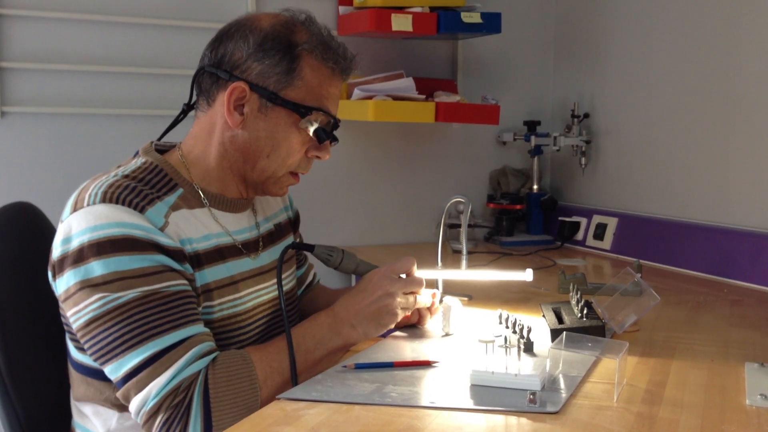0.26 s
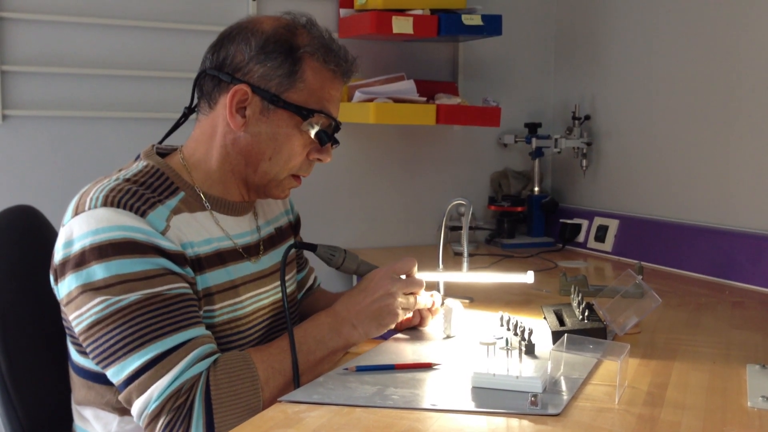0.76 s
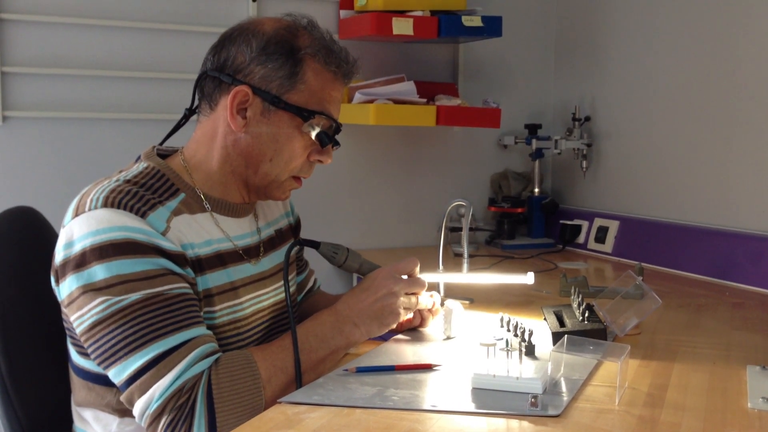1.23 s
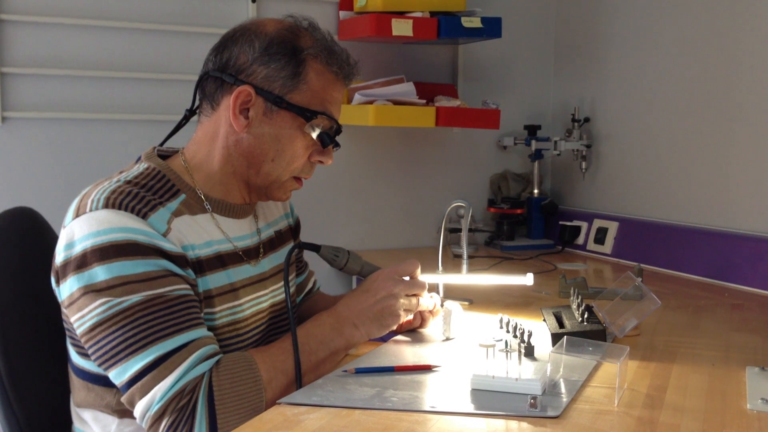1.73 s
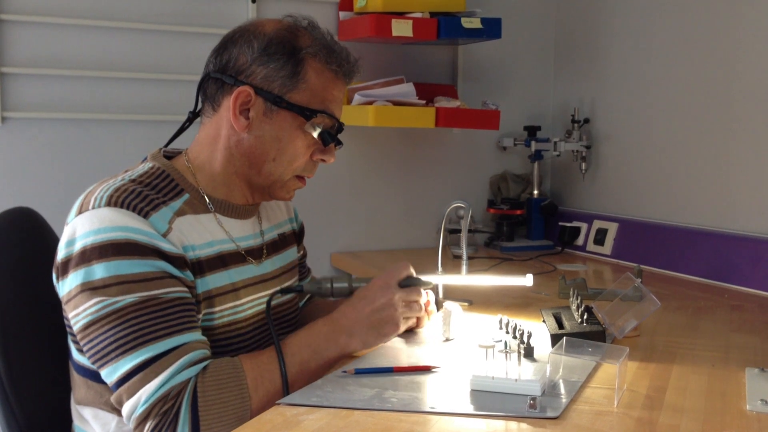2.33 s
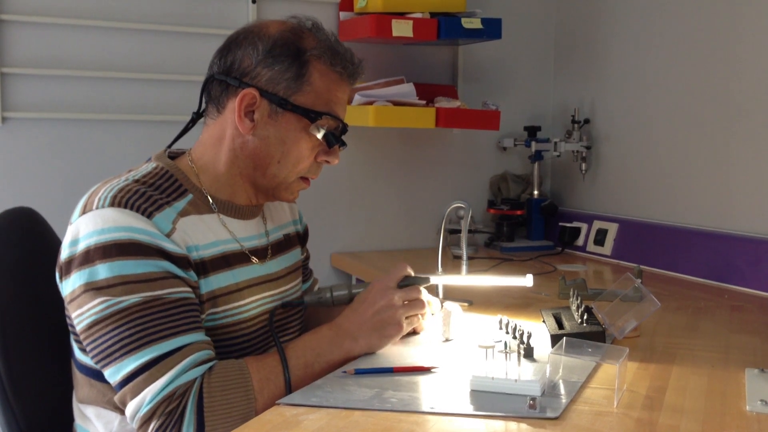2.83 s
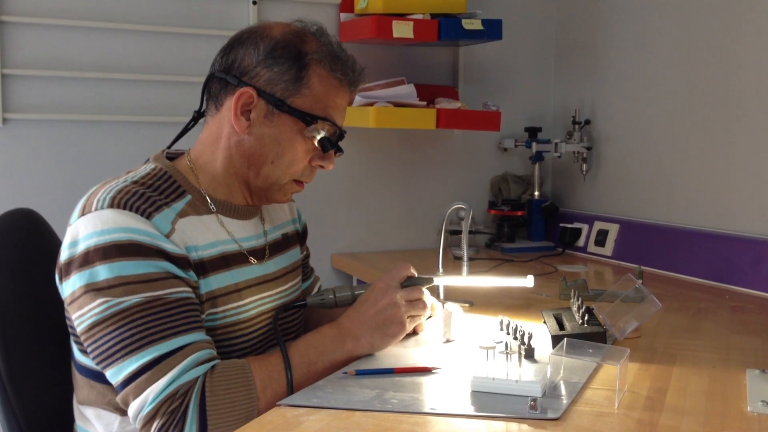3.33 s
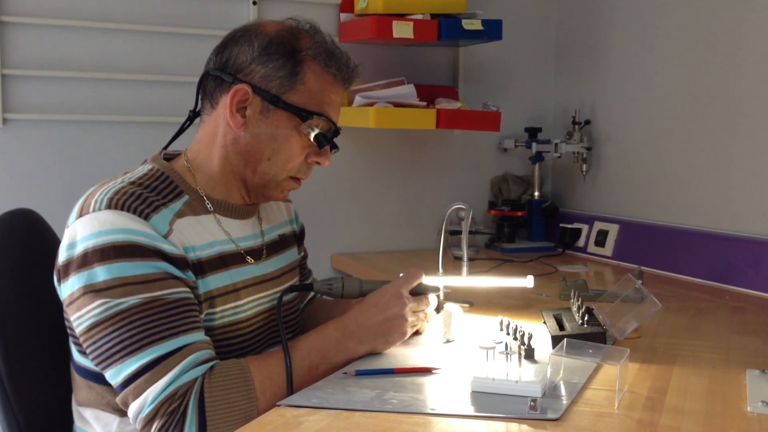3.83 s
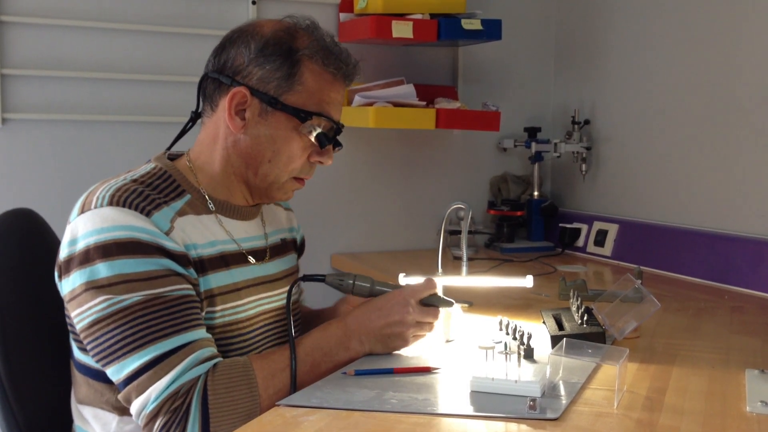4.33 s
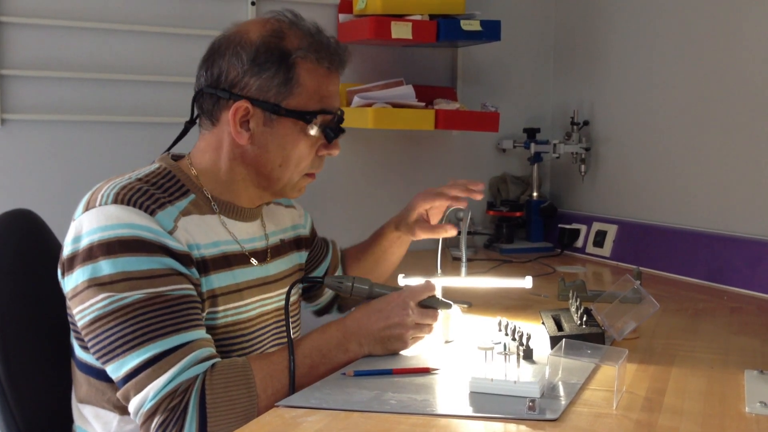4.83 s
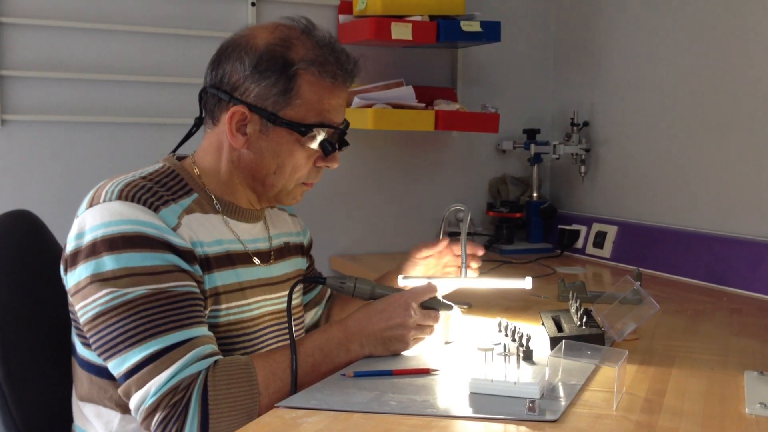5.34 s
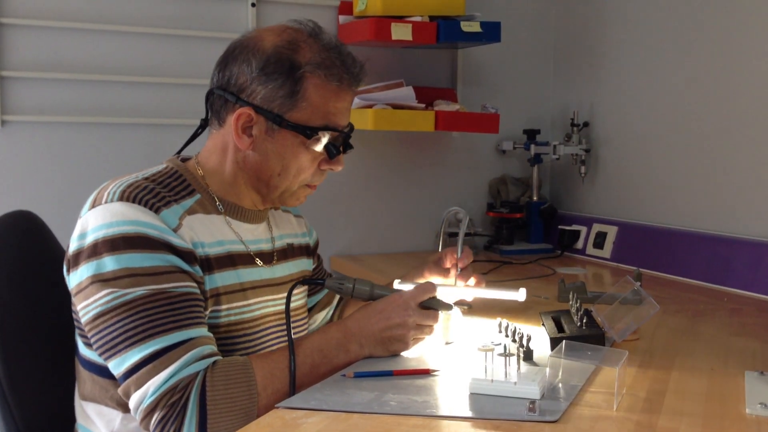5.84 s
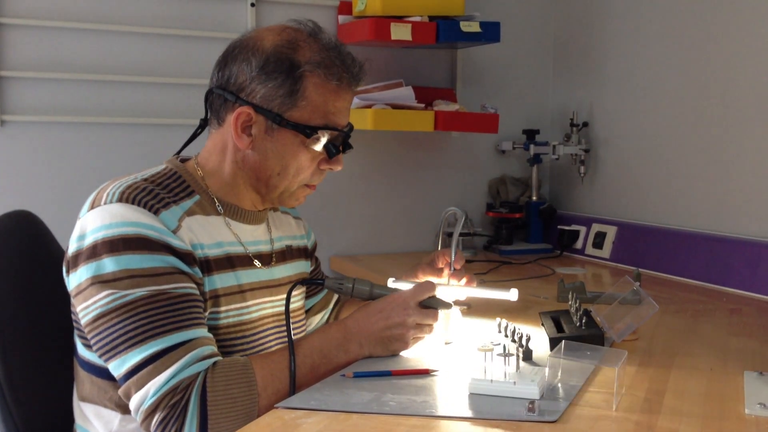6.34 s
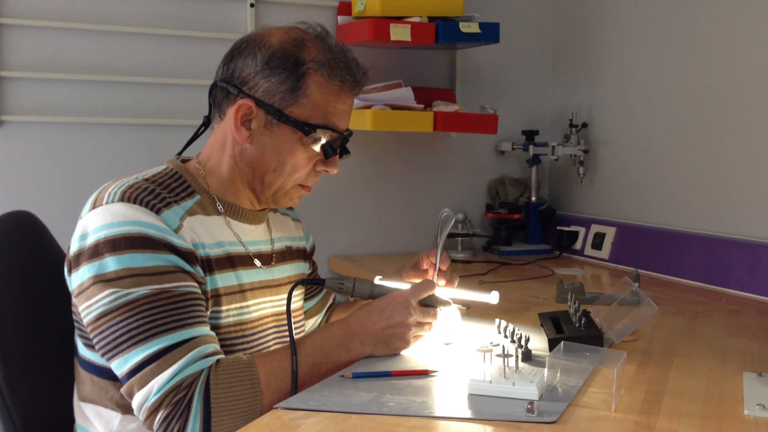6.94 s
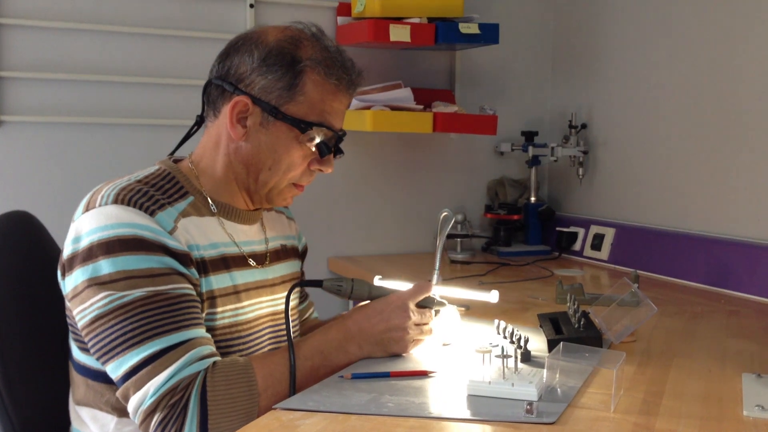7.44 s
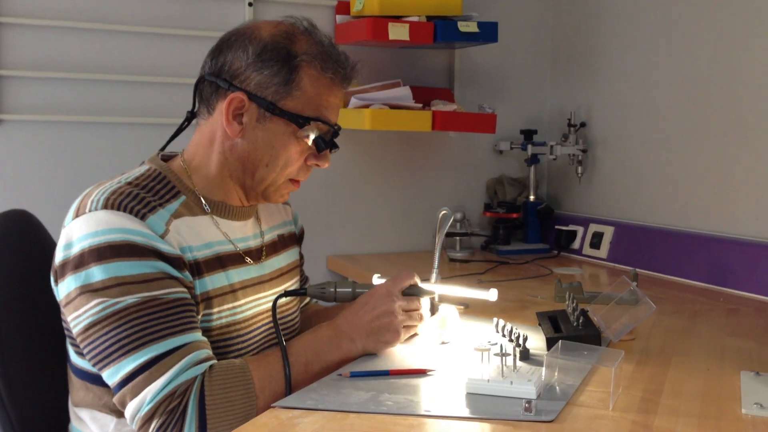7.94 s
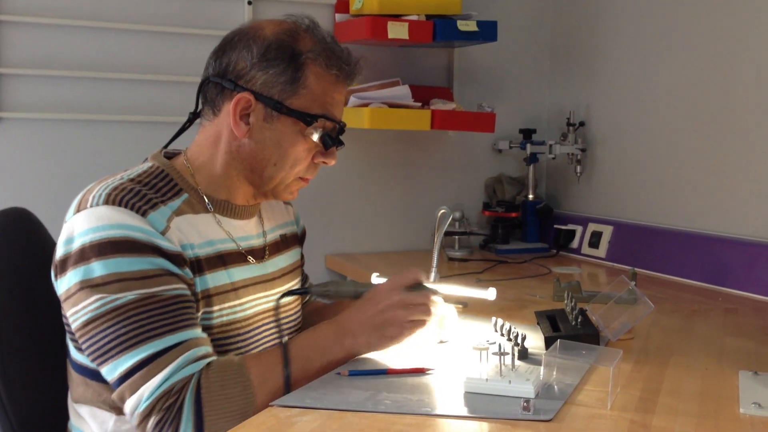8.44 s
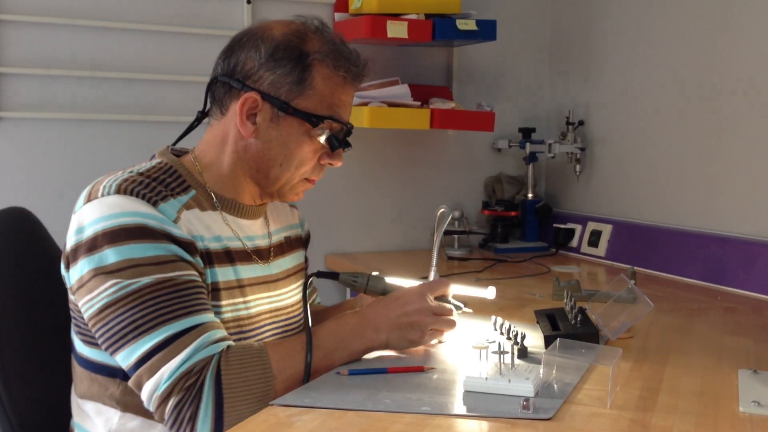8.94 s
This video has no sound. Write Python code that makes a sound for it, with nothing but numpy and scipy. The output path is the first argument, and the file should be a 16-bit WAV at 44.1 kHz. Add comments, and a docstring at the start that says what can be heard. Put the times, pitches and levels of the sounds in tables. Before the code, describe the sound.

Over an extractor's steady hiss and hum, a high-pitched rotary tool makes short grinding cuts, slows down, and later spins up again.

```python
"""At a workbench, one microphone close to a dental micromotor, mono. From the start the motor whines at
full speed over a dust extractor that hums and hisses throughout, its nine-bladed turbine singing louder
and softer as the hands move. The bur is just leaving a small workpiece and takes four more short, rasping
cuts in the first two seconds. Then the motor coasts down to idle; near eight seconds there is a soft
knock on the bench and it spins up again."""
import sys
import numpy as np
from scipy import signal
from scipy.fft import rfft, irfft, next_fast_len
from scipy.io import wavfile
from scipy.ndimage import uniform_filter1d, map_coordinates

SR = 44100
rng = np.random.default_rng(int(sys.argv[2]) if len(sys.argv) > 2 else 0)


def file_out(sig):
    """Save sig as 16-bit WAV at sys.argv[1]."""
    # one column per channel
    cols = np.atleast_2d(sig).T
    # limit, then scale
    lim = np.clip(cols, -1, 1)
    pcm = np.round(lim * 32767).astype(np.int16)
    wavfile.write(sys.argv[1], SR, pcm)


N = 404838

IDLE_HZ, FULL_HZ, RESTART_HZ = 228.8, 395.2, 390  # motor speeds, in turns a second
COAST_S, COAST_HZ_PER_S, EASE_HZ = 2.2, 158, 23  # switched down: a steady fall that eases into idle
RESTART_S, SPIN_UP_S = 7.88, 0.325  # switched up again: start, time constant
CUT_ATTACK_S, CUT_RELEASE_S = 0.038, 0.0234  # time to bite, time constant of letting go

# the motor's 9th order as the tool is turned in the hand: time_s, level_db
NINTH_ORDER = [(0, -44.5), (2.05, -46), (2.22, -54.5), (2.5, -47), (3.2, -52), (3.72, -42.5), (4.18, -60),
               (4.35, -47), (4.58, -44), (4.72, -60), (5.1, -63), (5.55, -46.5), (7.05, -47), (7.8, -50),
               (8, -52), (8.25, -45.5), (8.6, -53.5), (9.18, -53)]
# its 15th order, singing out near full speed: speed_hz, level_db
FIFTEENTH_ORDER = [(229, -78), (300, -58), (358, -52), (376, -41.5), (388, -40.5), (395, -33.3)]
# weaker lines, whole orders from the rotor, the rest from the ball bearings: order, idle_db, full_db
WEAK_ORDERS = [(3.015, -82, -65), (4.345, -73, -59.5), (5.343, -70, -64), (6.45, -78, -66),
               (9.98, -71, -59), (30, -135, -51), (17, -74, -67), (18, -78, -67), (20, -73, -66),
               (22, -76, -67), (25, -83, -66), (26.45, -73, -80), (27.01, -71.5, -78), (27.28, -72, -80),
               (27.86, -65, -80), (28.45, -74, -82), (28.83, -72, -80), (29.63, -73.5, -80),
               (31.23, -67.5, -78), (38.14, -69, -80), (40.14, -71, -80)]
# resonances of the motor housing, added to the weaker lines: frequency_hz, gain_db
HOUSING_RESPONSE = [(1500, -1), (1700, 5), (1900, 12), (2100, -0.5), (5500, -4.5), (6050, 10), (6800, 8),
                    (7400, 2.5), (8000, 0)]
# hiss of the ball bearings: frequency_hz, density_db
BEARING_SPECTRUM = [(800, -25), (2500, -21), (5000, 3), (6400, 4.5), (8000, -19), (9700, 2), (11500, -9),
                    (13500, -3), (15000, -10)]
# air in the extractor's duct: frequency_hz, density_db
DUCT_SPECTRUM = [(25, -31), (70, -28), (100, -15), (135, -9), (190, 0), (290, -6.5), (360, -8), (620, -5.5),
                 (770, 1.5), (980, 3), (1130, -2.5), (1240, 2), (1370, -15.5), (2200, -17.5)]
# air at its intake: frequency_hz, density_db
INTAKE_SPECTRUM = [(700, -63), (1350, -6.5), (1650, 1), (2100, 1), (2700, -0.5), (3200, -3.5), (4000, -1),
                   (5300, -4), (6600, 0.5), (8000, -5.5), (9500, -3.5), (11500, -9.5), (13500, -11.5),
                   (15400, -19), (17000, -120)]
# blade-pass tone of its turbine: time_s, pitch_hz
BLADE_PITCH = [(0, 2404), (0.55, 2430), (1.1, 2437), (1.85, 2446), (2.1, 2465), (2.8, 2469), (4.25, 2485),
               (4.9, 2462), (5.3, 2480), (5.8, 2471), (7.35, 2462), (7.8, 2470), (9.18, 2472)]
# the blade tone swelling and fading as the hands move: time_s, level_db
BLADE_SWELL = [(0, -57), (0.1, -39.5), (0.55, -45), (1.05, -57.5), (1.5, -46), (1.75, -52), (1.92, -41),
               (2.32, -42.5), (2.44, -54), (2.62, -42.5), (3.1, -36.5), (3.7, -39.5), (3.95, -44.5),
               (4.42, -41.5), (4.8, -57), (5.08, -57), (5.18, -43.5), (5.55, -36), (5.9, -45), (6.4, -46),
               (6.7, -54.5), (7, -53), (7.13, -44), (7.48, -57), (7.7, -59), (7.8, -43.5), (8.23, -37.5),
               (8.55, -43), (9.05, -36.5)]
# hum of the turbine's shaft: time_s, level_db
SHAFT_LEVEL = [(0, -54), (0.7, -50), (2, -50.5), (4.7, -54.5), (6.3, -51), (9.18, -52.5)]
# mains hum and faint steady machine tones: pitch_hz, level_db
HUM_TONES = [(100, -81.5), (199.8, -56), (299.8, -63.5), (754, -64), (974, -74.5), (1098, -65),
             (1207, -60.5), (1244, -72)]
# cuts of the bur, the first already under way: start_s, length_s, final_rasp_db, initial_ring_db
BUR_CUTS = [(-0.04, 0.048, -35.5, -44), (0.567, 0.099, -25.5, -35), (0.883, 0.045, -35, -50),
            (1.144, 0.274, -30, -45), (1.807, 0.081, -29, -46)]
# rasp of the bur on the workpiece: frequency_hz, gain_db
RASP_RESPONSE = [(300, -43), (1200, -24), (2700, -8.5), (3300, -14), (3950, -2.5), (4350, -5), (4750, -3),
                 (5500, 1.5), (6300, 7.5), (6800, 1), (7700, -4), (9500, -6), (13500, -15), (15000, -19)]
# resonance of the workpiece: frequency_hz, gain_db
WORKPIECE_RESPONSE = [(4300, -44), (4730, 2), (5150, -6), (5550, -47)]
# quick contacts with the bench, heard as one soft knock: start_s, thump_db, scuff_db
KNOCK_CONTACTS = [(7.854, -22.5, -42), (7.869, -42, -36), (7.888, -35, -48), (7.917, -38, -39),
                  (7.945, -35, -44)]
# modes of the bench: pitch_hz, gain_db, t60_s
BENCH_MODES = [(187, -26, 0.089), (311, -3.5, 0.089), (427.6, -21, .08), (1010, -12, 0.096)]
# dull scuff of each contact: frequency_hz, density_db
SCUFF_SPECTRUM = [(100, -27), (300, 6.5), (1000, 0), (2500, -0.5), (5000, -22), (12000, -30)]


def amp(db):
    """Decibels to gain."""
    return 10 ** (np.asarray(db) / 20)


def lookup(x, rows):
    """A two-column table read at x, along straight lines between its rows."""
    return np.interp(x, *np.transpose(rows))


def curve(rows):
    """A table over time, as one value per sample."""
    return lookup(np.arange(N) / SR, rows)


def wobble(rate):
    """A smooth random curve, rate knots a second."""
    coarse = np.arange(0, N + 32, 32)
    knots = rng.standard_normal(int(N * rate / SR) + 4)
    return np.interp(np.arange(N), coarse, map_coordinates(knots, [coarse * rate / SR]))


def filtered(x, response):
    """x through a filter whose gain is response(hz)."""
    size = next_fast_len(N + 8192)
    return irfft(rfft(x, size) * response(np.fft.rfftfreq(size, 1 / SR)), size)[..., :N]


def coloured(x, spectrum):
    """x shaped by (Hz, dB) points on a log axis, at rms 1."""
    points_hz, db = np.transpose(spectrum)
    shaped = filtered(x, lambda hz: amp(np.interp(np.log(hz + 1), np.log(points_hz), db)))
    return shaped / np.sqrt(np.mean(shaped ** 2) + 1e-20)


def noise(spectrum):
    """Coloured noise of rms 1."""
    return coloured(rng.standard_normal(N), spectrum)


def tone(cycles, rough, rate):
    """A sine of rms about 1 whose strength and phase flutter by the share rough."""
    angle = 2 * np.pi * (cycles + rng.random())
    in_phase = (1 + rough * wobble(rate)) * np.sin(angle)
    quadrature = rough * wobble(rate) * np.cos(angle)
    return (in_phase + quadrature) / np.sqrt(.5 + rough ** 2)


def room(x, wet_db, t60):
    """The close sound with the short, dense echo of bench and walls behind it."""
    t = np.arange(SR // 4) / SR
    tail = rng.standard_normal(len(t)) * amp(-60 * t / t60) * (t > .002)
    echo = signal.fftconvolve(x, tail / np.linalg.norm(tail))[:N]
    return (x + amp(wet_db) * echo) / np.hypot(1, amp(wet_db))


def motor_speed(load, sag_hz=0.808):
    """Full speed, a coast down to idle and a spin-up; the load (0-1) slows it a little."""
    t = np.arange(N) / SR
    above_idle = FULL_HZ - IDLE_HZ - COAST_HZ_PER_S * (t - COAST_S)
    eased = (above_idle + np.hypot(above_idle, EASE_HZ)) / 2
    coast = np.minimum(FULL_HZ, IDLE_HZ + eased)
    spin_up = (RESTART_HZ - IDLE_HZ) * (1 - np.exp(-np.maximum(t - RESTART_S, 0) / SPIN_UP_S))
    return coast + spin_up - sag_hz * load


def motor(speed, turns, load, sway_db=0.05, choke_db=2.5, strain_db=2.5):
    """Rotor and bearing lines locked to the shaft, over a bearing hiss that grows with speed."""
    acceleration = uniform_filter1d(np.gradient(speed) * SR, 4000)
    glide = np.clip(np.abs(acceleration) / 25, 0, 1)
    # flutter stands for echoes of the earlier pitch beating with each line as the speed changes
    rough = .07 + .35 * glide
    whine = amp(curve(NINTH_ORDER)) * tone(9 * turns, rough, rate=50)
    whine += amp(lookup(speed, FIFTEENTH_ORDER)) * tone(15 * turns, rough, rate=50)
    whine *= amp(-sway_db * wobble(7) - choke_db * load)  # the hand sways it, a cut damps it
    for order, idle_db, full_db in WEAK_ORDERS:
        line_db = np.interp(speed, [IDLE_HZ, FULL_HZ], [idle_db, full_db])
        line_db += lookup(order * speed, HOUSING_RESPONSE)  # lights up at each resonance it passes
        line_db += strain_db * glide  # grows while the motor brakes or accelerates
        whine += amp(line_db) * tone(order * turns, rough + 0.047, rate=30)
    hiss_db = -46.5 + 70 * np.log10(speed / FULL_HZ)
    hiss = amp(hiss_db) * noise(BEARING_SPECTRUM)
    return whine + room(hiss, wet_db=-4, t60=0.16)


def extractor_turbine(blade_count=9):
    """Mains hum, a shaft tone and the tone of the passing blades, airy when it is faint."""
    blade_db = curve(BLADE_SWELL)
    passes = np.cumsum(curve(BLADE_PITCH) + 1.436 * wobble(12)) / SR
    airy = np.interp(blade_db, [-57, -41], [.5, .07])
    blades = amp(blade_db) * tone(passes, airy, rate=70)
    shaft = amp(curve(SHAFT_LEVEL)) * tone(passes / blade_count, rough=0.037, rate=8.1)
    hum = sum(amp(db) * tone(hz * np.arange(N) / SR, rough=0.12, rate=9) for hz, db in HUM_TONES)
    return blades + shaft + hum


def extractor_air(duct_db=-49.0, intake_db=-44.0):
    """Air rushes through the extractor's intake and duct; the room ripples its colour."""
    duct = amp(duct_db + 0.53 * wobble(7.4)) * noise(DUCT_SPECTRUM)
    intake = amp(intake_db + 0.13 * wobble(2.88)) * noise(INTAKE_SPECTRUM)
    return room(duct + intake, wet_db=-9.5, t60=0.17)


def cut_gains(press_db=5):
    """Each cut bites, bears down and lets go; the growing pressure lifts the rasp and damps the ring."""
    t = np.arange(N) / SR
    rasp_gain, ring_gain = np.zeros((2, N))
    for start_s, length_s, rasp_db, ring_db in BUR_CUTS:
        attack = np.clip((t - start_s) / CUT_ATTACK_S, 0, 1)
        progress = np.clip((t - start_s) / length_s, 0, 1)
        release = np.exp(-np.maximum(t - start_s - length_s, 0) / CUT_RELEASE_S)
        rasp_gain += amp(rasp_db + press_db * (progress - 1)) * attack * release
        ring_gain += amp(ring_db - press_db * progress) * attack * release
    return rasp_gain, ring_gain


def bur(turns, rasp_gain, ring_gain, memory=0.72, off_centre=0.3, graze_db=-48, points_per_turn=128):
    """The bur meets nearly the same roughness each turn, wearing it anew: a comb of fuzzy lines."""
    roughness = rng.standard_normal((int(turns[-1]) + 2, points_per_turn))
    worn = signal.lfilter([1], [1, -memory], roughness, axis=0)
    scrape = map_coordinates(worn.ravel(), [turns * points_per_turn])
    scrape *= 1 + off_centre * np.cos(2 * np.pi * turns)  # it presses harder once a turn
    scrape *= amp(0.7 * wobble(69.2))  # the hand trembles
    # between cuts the bur brushes the piece, until the motor coasts
    graze = amp(graze_db) * np.exp(-np.maximum(np.arange(N) / SR - COAST_S, 0) / CUT_RELEASE_S)
    rasp = np.hypot(rasp_gain, graze) * coloured(scrape, RASP_RESPONSE)
    ring = ring_gain * coloured(scrape, WORKPIECE_RESPONSE)
    return room(rasp + ring, wet_db=-11, t60=0.26)


def bench_knock(attack_s=0.0077, scuff_t60=0.2):
    """Soft contacts set the bench ringing briefly, each with a dull scuff."""
    knock = np.zeros(N)
    for start_s, thump_db, scuff_db in KNOCK_CONTACTS:
        t = np.maximum(np.arange(N) / SR - start_s, 0)
        thump = sum(amp(db - 60 * t / t60) * np.sin(2 * np.pi * hz * t) for hz, db, t60 in BENCH_MODES)
        scuff = amp(-60 * t / scuff_t60) * noise(SCUFF_SPECTRUM)
        attack = 1 - np.exp(-t / attack_s)
        knock += attack * (amp(thump_db) * thump + amp(scuff_db) * scuff)
    return knock


def scene():
    """The bench from close up, in mono: the cuts load the motor, whose turns drive whine and rasp."""
    rasp_gain, ring_gain = cut_gains()
    load = rasp_gain / rasp_gain.max()
    speed = motor_speed(load)
    turns = np.cumsum(speed * (1 + 0.0003 * wobble(10))) / SR
    grinding = bur(turns, rasp_gain, ring_gain)
    mono = motor(speed, turns, load) + grinding + extractor_air() + extractor_turbine() + bench_knock()
    return np.array([mono, mono])


def record(dry, top_hz=15480):
    """The microphone's chain passes nothing above a steep band limit."""
    return filtered(dry, lambda hz: 1 / np.sqrt(1 + (hz / top_hz) ** 700))


dry = scene()
out = record(dry)
file_out(out)
```